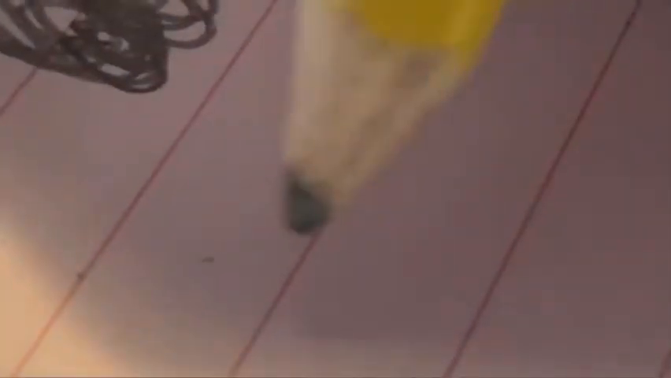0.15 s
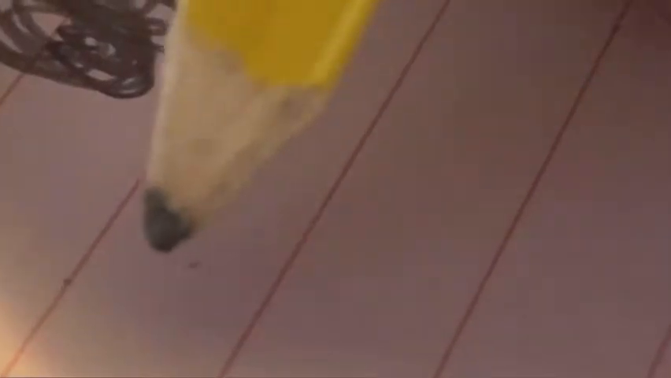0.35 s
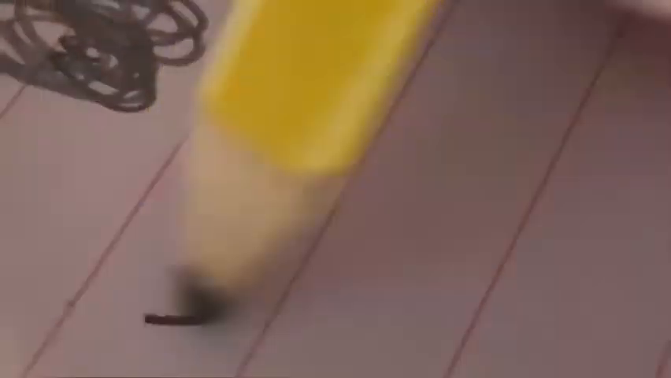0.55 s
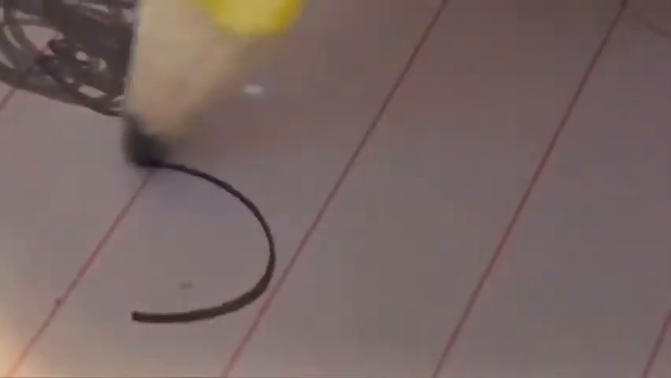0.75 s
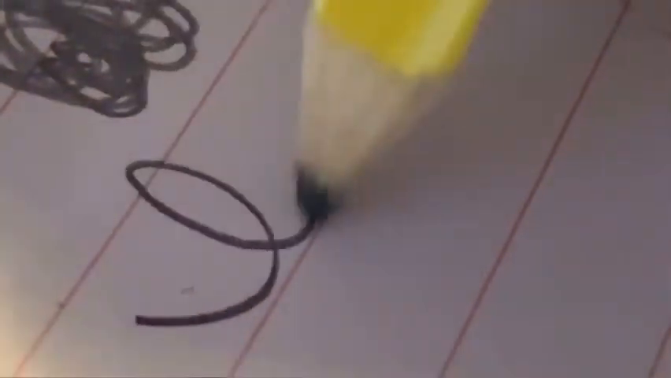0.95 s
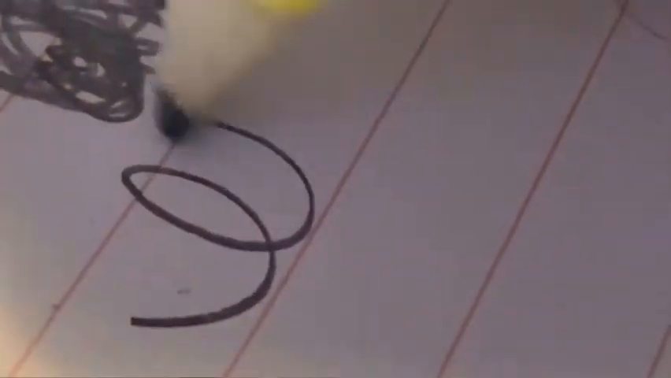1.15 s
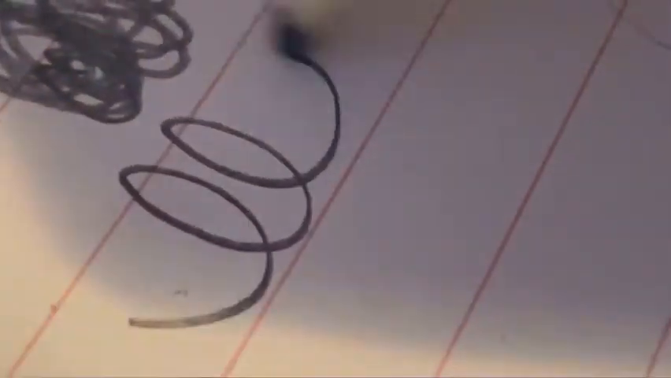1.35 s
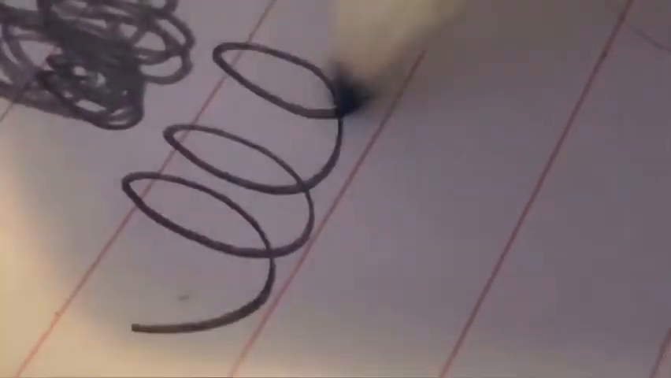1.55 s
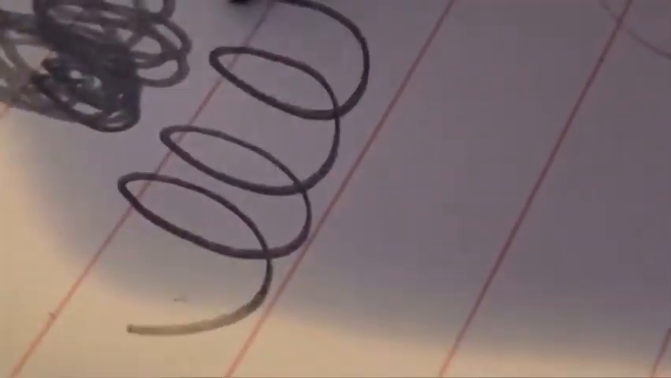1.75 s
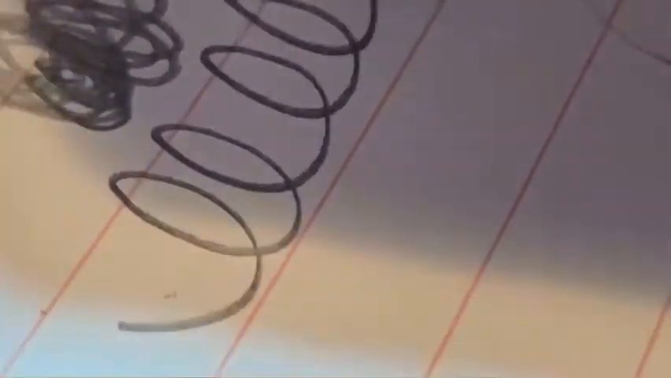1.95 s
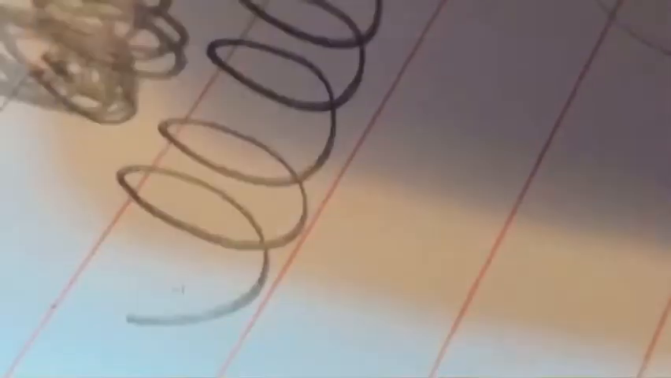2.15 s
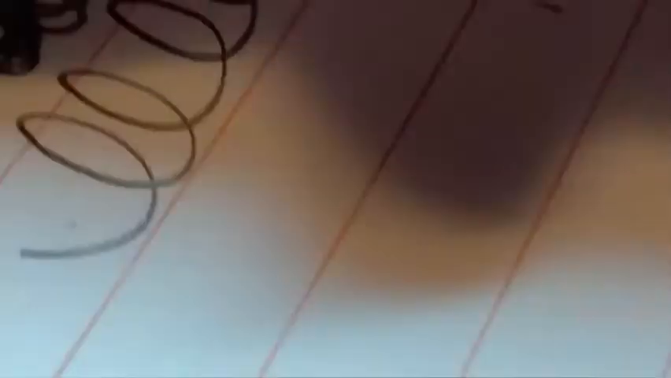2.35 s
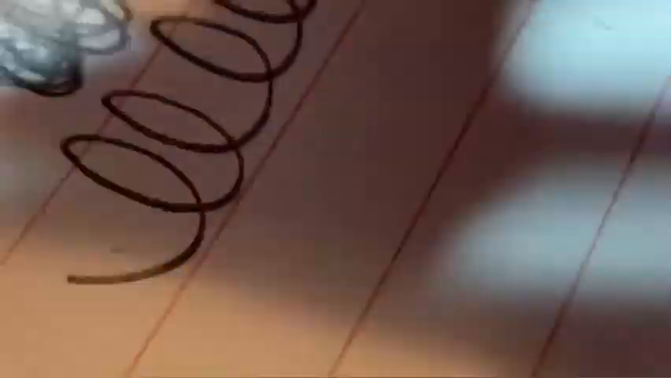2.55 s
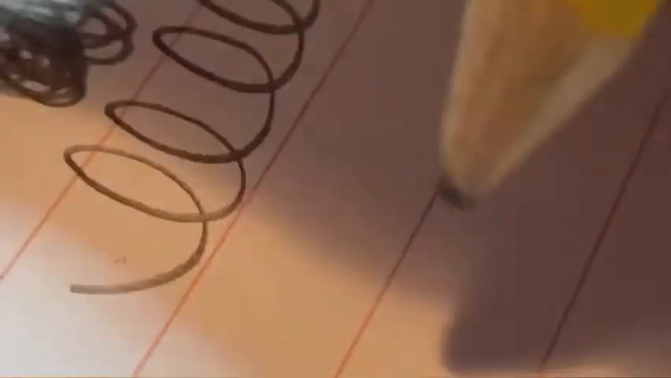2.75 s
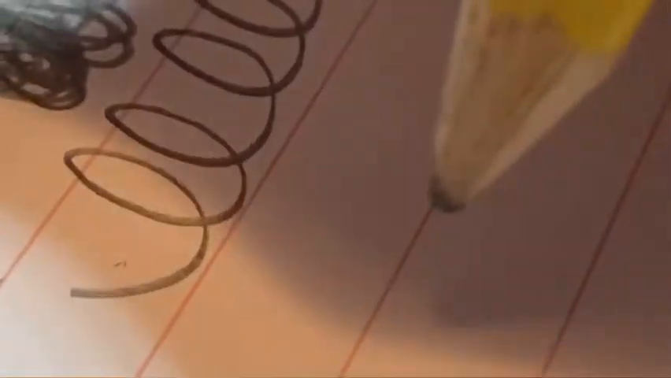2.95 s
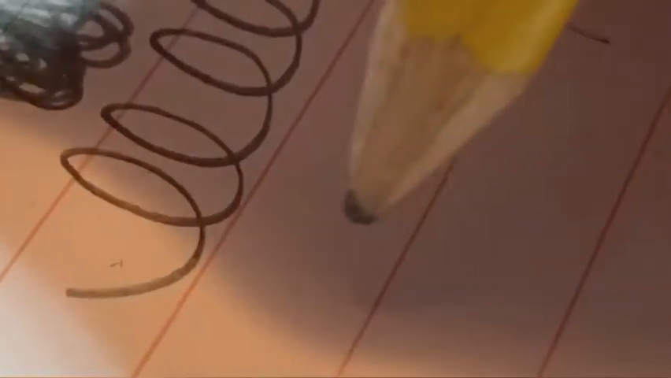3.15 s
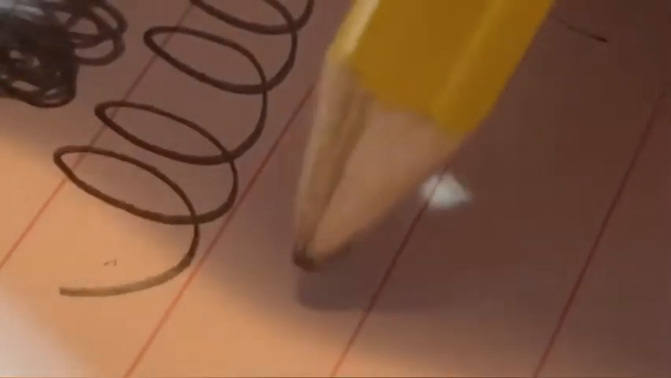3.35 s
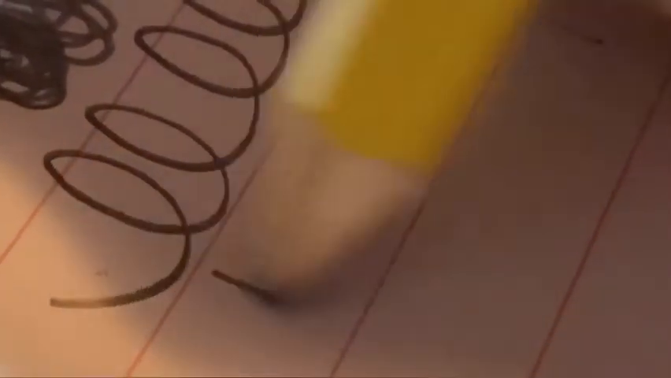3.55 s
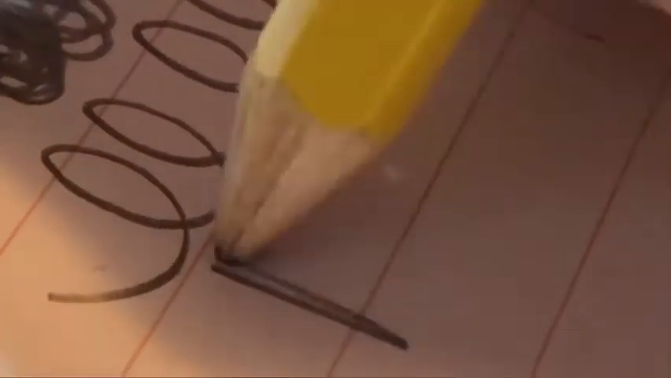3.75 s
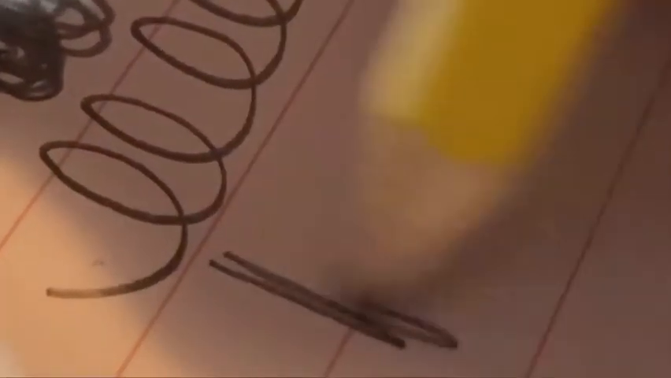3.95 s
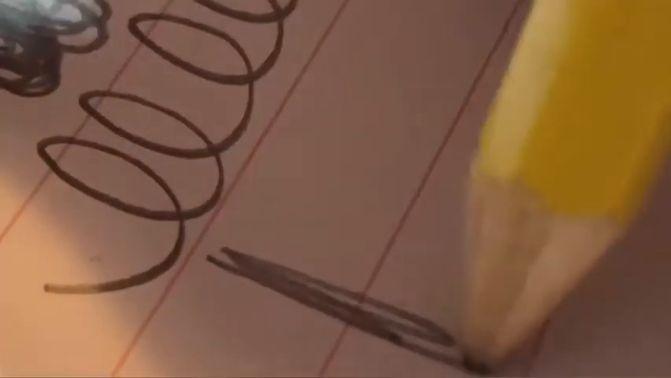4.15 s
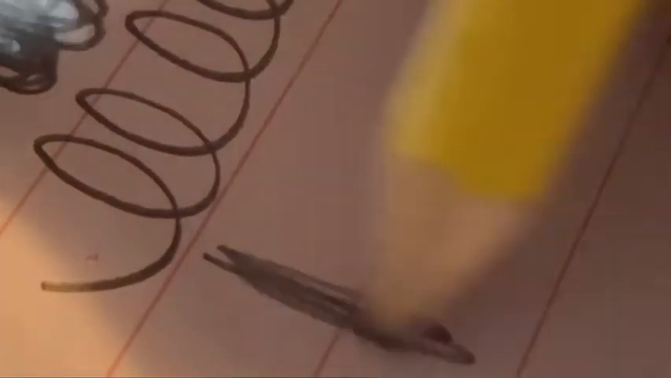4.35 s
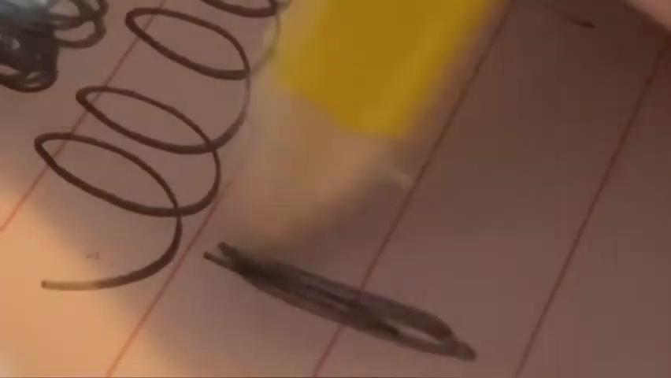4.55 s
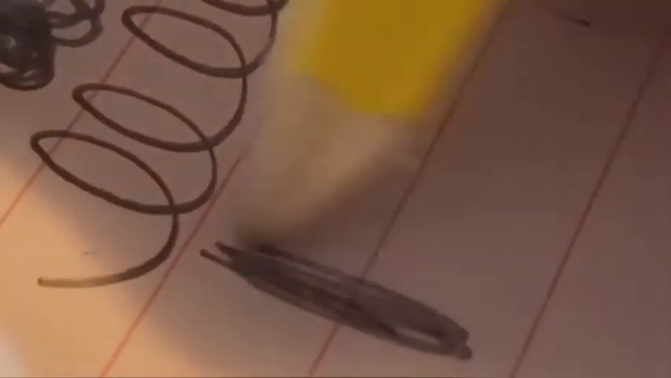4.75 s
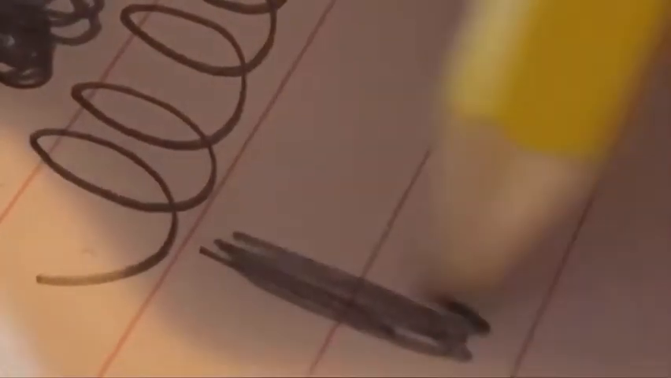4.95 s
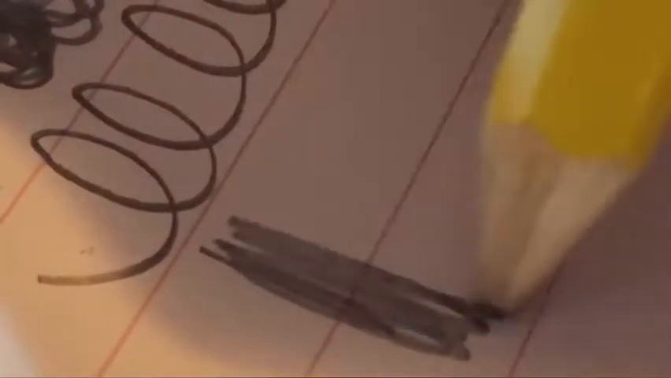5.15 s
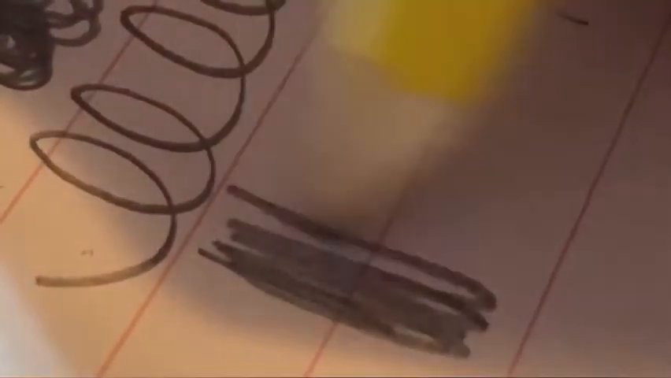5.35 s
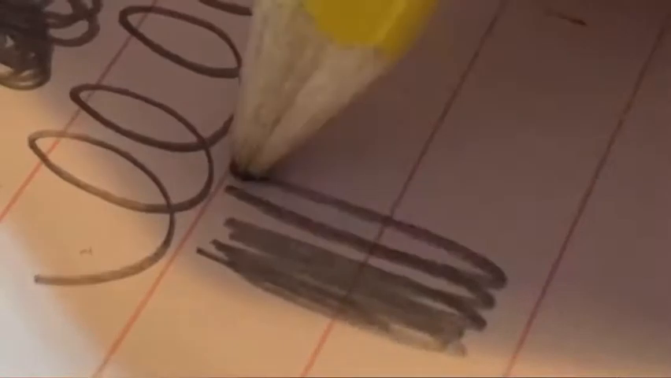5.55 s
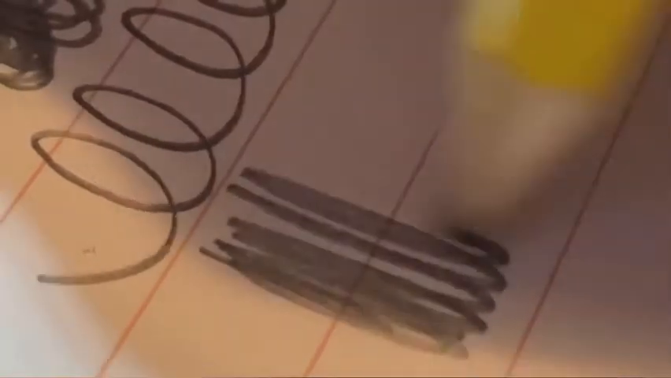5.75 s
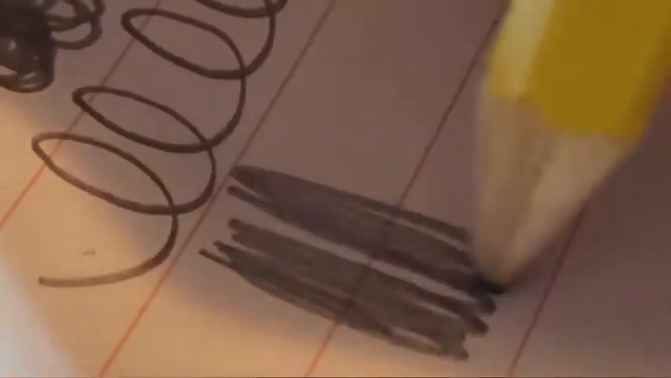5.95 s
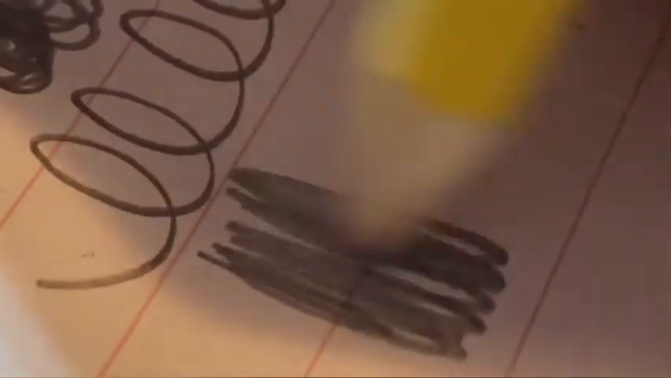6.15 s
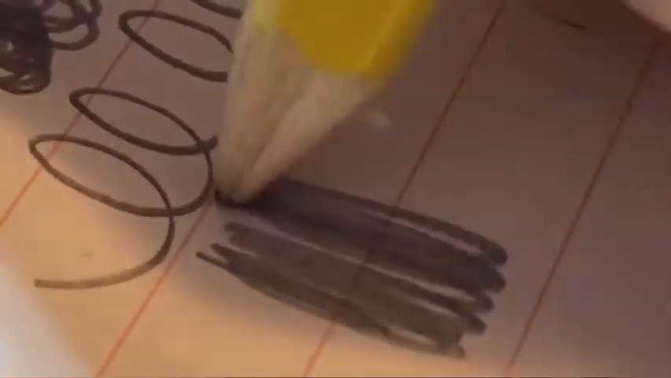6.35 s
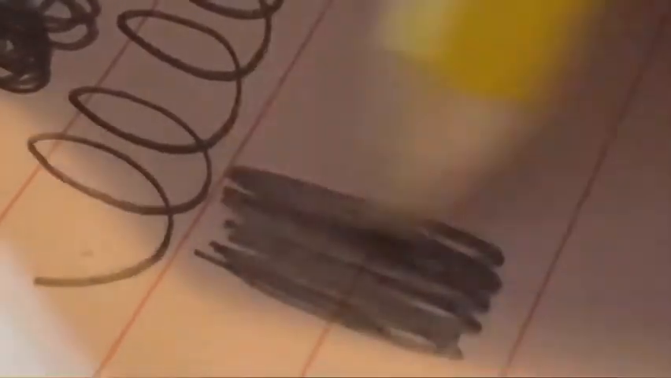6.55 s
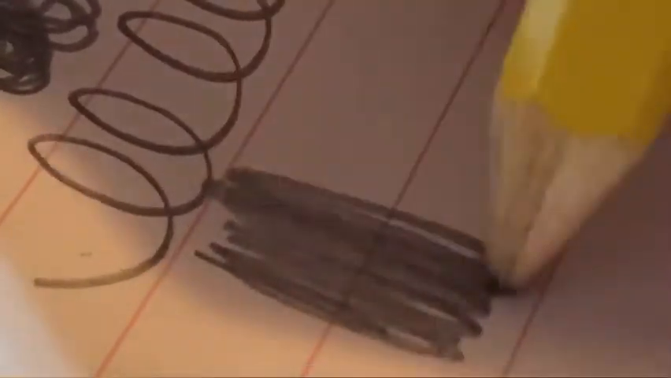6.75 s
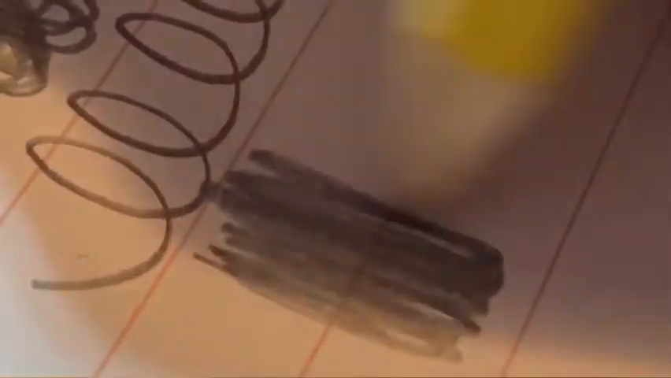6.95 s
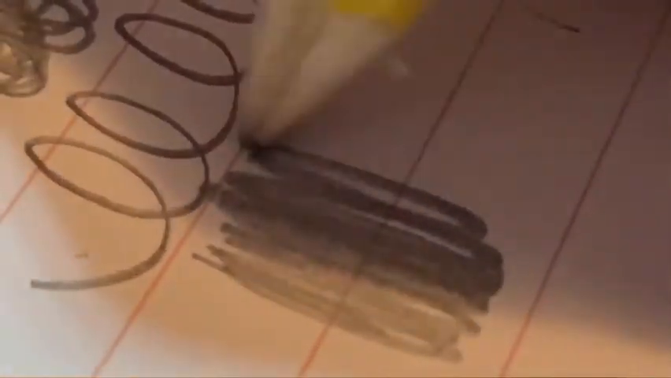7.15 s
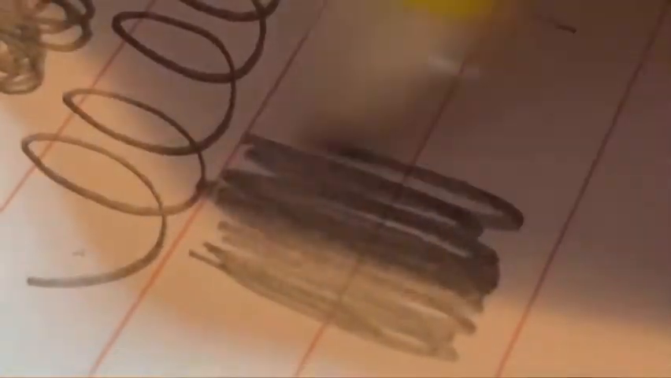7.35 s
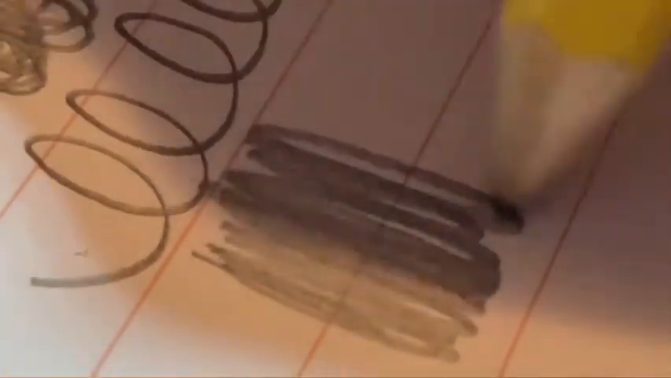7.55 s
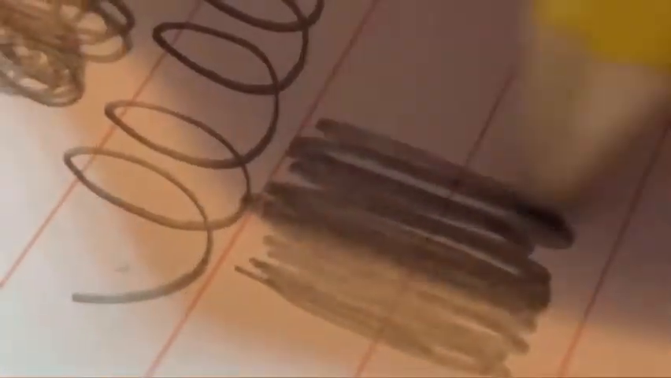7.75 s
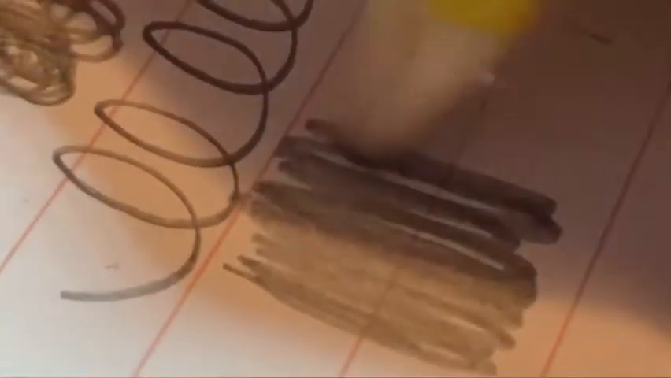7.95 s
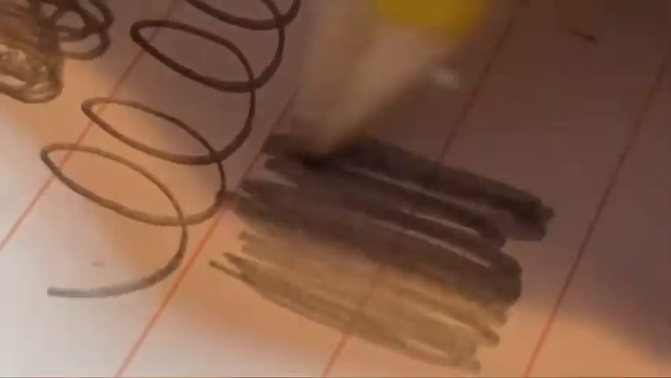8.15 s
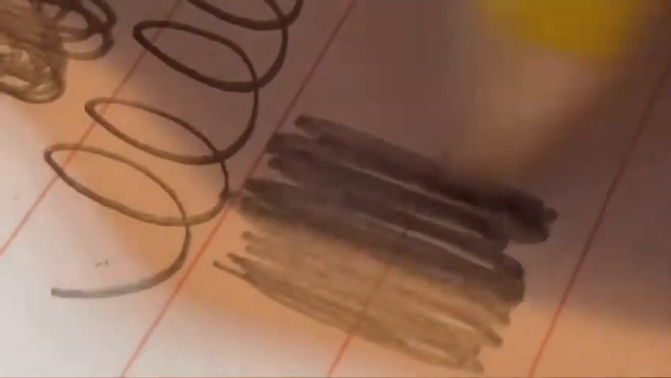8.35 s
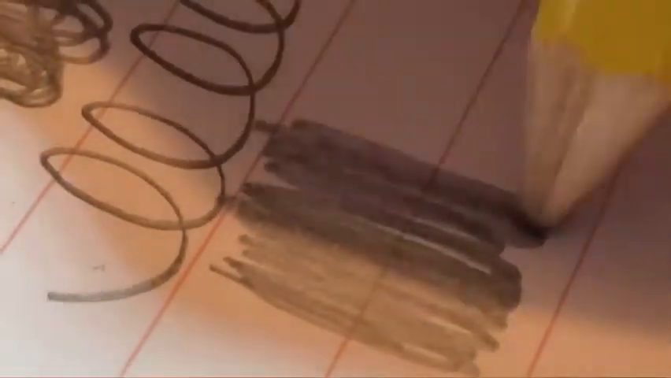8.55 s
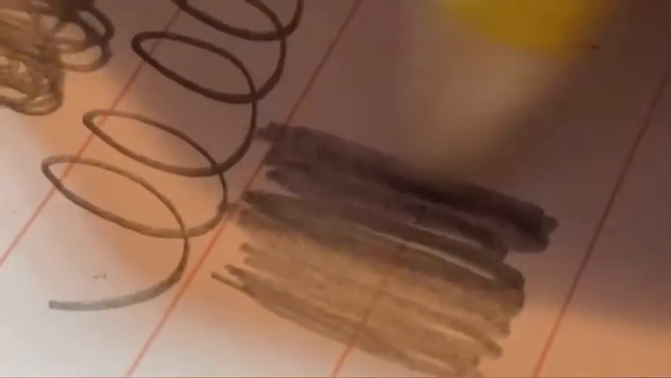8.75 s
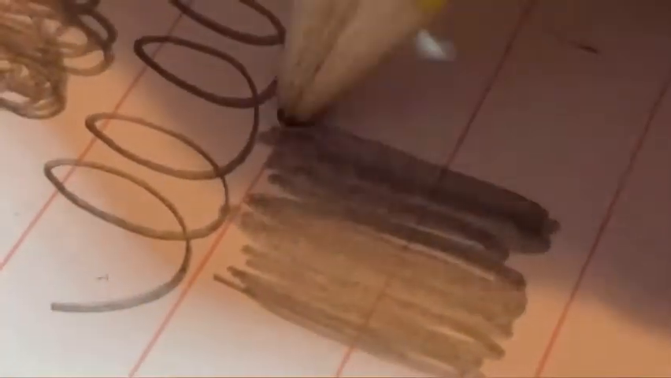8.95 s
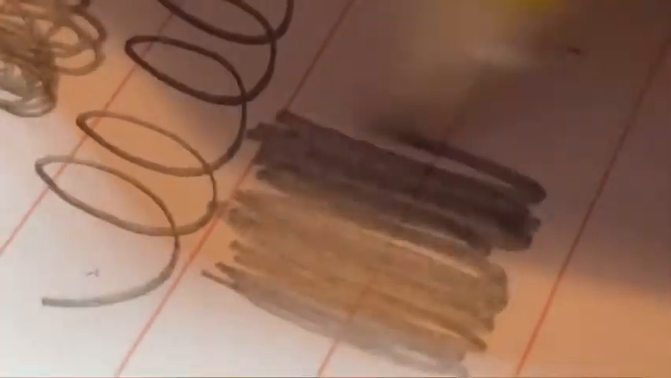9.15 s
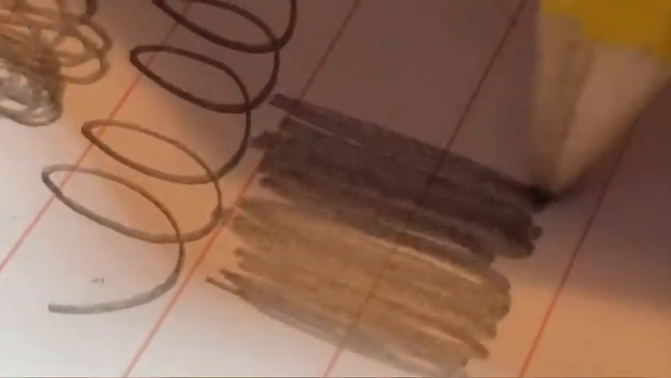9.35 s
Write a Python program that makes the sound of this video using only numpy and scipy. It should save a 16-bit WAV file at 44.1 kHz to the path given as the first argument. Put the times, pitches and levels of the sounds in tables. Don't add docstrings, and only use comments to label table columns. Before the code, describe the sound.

A wooden pencil scratches six quick loops on paper, a hand slides softly across the sheet, then rapid back-and-forth shading grows stronger, close up.

```python
import sys
import numpy as np
from scipy import signal
from scipy.fft import rfft, irfft, next_fast_len
from scipy.io import wavfile
from scipy.ndimage import uniform_filter1d

SR = 44100
rng = np.random.default_rng(int(sys.argv[2]) if len(sys.argv) > 2 else 0)


def pcm_store(signal):
    levels = np.round(np.clip(np.atleast_2d(signal), -1, 1) * 32767)
    wavfile.write(sys.argv[1], SR, levels.astype(np.int16).T)


def ratio(d):
    e = np.asarray(d, float) / 20
    return 10 ** e


N = 414981


def seconds():
    return np.arange(N) / SR


def rms_one(x):
    return x / np.sqrt(np.mean(x ** 2) + 1e-20)


def in_time(rows):
    s, *columns = np.transpose(rows)
    return [np.interp(seconds(), s, column) for column in columns]


def at_hz(points, hz):
    points = np.array(points)
    return np.interp(np.log(np.maximum(hz, 1)), np.log(points[:, 0]), points[:, 1])


def drift(per_s):
    r = np.exp(-80 * np.pi * per_s / SR)
    noise = rng.standard_normal(N // 40 + 2002)
    slow = signal.lfilter([1], [1, -2 * r, r * r], noise)[2000:]
    return np.interp(np.arange(N) / 40, np.arange(len(slow)), rms_one(slow))


def resonate(x, hz, width_hz):
    r = np.exp(-np.pi * width_hz / SR)
    poles = [1, -2 * r * np.cos(2 * np.pi * hz / SR), r * r]
    return signal.lfilter([(1 - r * r) / 2, 0, (r * r - 1) / 2], poles, x)


def passband(x, low_hz, high_hz):
    return signal.sosfilt(signal.butter(2, [low_hz, high_hz], "band", fs=SR, output="sos"), x)


def swell(times, levels_db):
    at = np.arange(round((times[0] - .0015) * SR), round((times[-1] + .0015) * SR))
    s = at / SR
    inside = np.minimum(s - times[0], times[-1] - s)
    return at, np.interp(s, times, levels_db), np.clip(.5 + inside / .003, 0, 1)


def fibres(per_s, spread_db):
    sizes = ratio(spread_db * np.minimum(rng.exponential(1, N), 4))
    signs = rng.choice([-1, 1], N)
    return sizes * signs * (rng.random(N) < per_s / SR)


def body(flicks, modes, flicker_db):
    ringing = 0
    for k, (hz, width_hz, db) in enumerate(modes):
        ringing = ringing + ratio(db + flicker_db * drift(11.7)) * resonate(flicks[k % 2], hz, width_hz)
    return rms_one(ringing)


# (frequency [Hz], width [Hz], level [dB])
DESK_MODES = [(78, 20.4, 3), (150, 45, 1), (271, 150, 2), (386, 200, -2)]
PAD_MODES = [(600, 280, 0.5), (782, 147, -3.5), (804, 100, -9)]
SHAFT_MODES = [(1750, 290, 8), (2340, 670, 9.5), (2820, 530, 7)]
LEAD_MODES = [(4352, 424, 7.5), (4660, 120, -61), (6250, 490, -5)]
TIP_MODES = [(8155, 290, 1), (10270, 3000, 0.5), (12320, 310, -4), (13900, 1300, -5.5), (16000, 380, 0.5)]
# (frequency [Hz], width [Hz], level [dB])
UPRIGHT_LEAD_MODES = [(4170, 930, 0), (4700, 360, -0.5), (5040, 1000, -18.5), (6800, 1500, -4.5)]


def pencil():
    flicks = [fibres(per_s=16000, spread_db=2.5), fibres(per_s=16000, spread_db=1.5)]
    upright = seconds() < OUT_STROKES[0][0]
    steep_lead = body(flicks, UPRIGHT_LEAD_MODES, flicker_db=-2.9)
    lead = np.where(upright, steep_lead, body(flicks, LEAD_MODES, flicker_db=1.47))
    lead = lead - .75 * resonate(lead, 5750, 450)
    shaft = body(flicks, SHAFT_MODES, flicker_db=2.5)
    tip = body(flicks, TIP_MODES, flicker_db=0.15)
    shaft = shaft + upright * (0.43 * resonate(shaft, 2670, 300) - 0.39 * resonate(shaft, 3350, 590))
    tip = tip - upright * .92 * resonate(tip, 13350, 1000)
    tip = tip + upright * 0.39 * resonate(tip, 16000, 1500)
    desk = passband(body(flicks, DESK_MODES, flicker_db=1.2), 56, 467)
    pad = passband(body(flicks, PAD_MODES, flicker_db=3.0), 213, 1010)
    parts = [lead, pad, passband(shaft, 1940, 7200), tip, desk]
    return ratio(0.5 * drift(56)) * np.sum(pencil_motion() * parts, axis=0)


def pencil_motion():
    gains = looping() + brushing() + shading()
    gains[4] = uniform_filter1d(gains[4], size=1300)
    return gains


# (start [s], stop [s], downswing [dB], bend [dB], upswing [dB])
LOOPS = [
    (0.325, 0.608, -48, -50, -45),
    (0.604, 0.941, -43, -50, -47),
    (0.941, 1.248, -44.5, -46.5, -42),
    (1.247, 1.542, -42, -47, -40),
    (1.562, 1.834, -39.5, -51, -41),
    (1.819, 1.947, -37, -42.5, -39),
]
LOOP_PARTS_DB = [1.5, -2.5, 2, 0.5, -10]
LOOP_FOLLOWS = [0.98, 0.24, 0.96, 0.84, 1.2]
RESTING_DB = [-76, -75, -76, -80, -62]


def looping():
    attack_s, release_s = 0.032, 0.063
    crest, bend = 0.22, 0.38
    breakaway_db = -12
    tip_wear_db_per_s = 3
    pad_settle_db, pad_settle_s = 8, 0.19
    gains, last_stop = np.zeros((5, N)), 0
    for start, stop, down_db, bend_db, up_db in LOOPS:
        length = stop - start
        cusp_db = -74 + 9.5 * start
        from_rest = start - last_stop > .008
        first_db = down_db + breakaway_db if from_rest else cusp_db
        times = [start, start + attack_s, start + crest * length + 0.0021,
                 start + bend * length, stop - release_s, stop]
        at, scratch_db, gate = swell(times, [first_db, down_db + 0.5, down_db, bend_db, up_db, cusp_db])
        parts_db = np.c_[LOOP_PARTS_DB] - 45 + np.c_[LOOP_FOLLOWS] * (scratch_db + 45)
        gains[:, at] += gate * ratio(parts_db)
        last_stop = stop
    at, _, gate = swell([LOOPS[0][0], last_stop], [0, 0])
    gains[:, at] += gate * ratio(np.c_[RESTING_DB])
    gains[3] *= ratio(-tip_wear_db_per_s * (seconds() - 2))
    gains[[1, 4]] *= ratio(pad_settle_db * np.exp((LOOPS[0][0] - seconds()) / pad_settle_s))
    return gains


# (start [s], stop [s], top level [dB])
BRUSHES = [
    (0.27, 0.283, -69),
    (3.245, 3.295, -58),
]
BRUSH_PARTS_DB = [-2.5, 0, -4, 0, -6.0]


def brushing():
    gains = np.zeros((5, N))
    for start, stop, top_db in BRUSHES:
        at, brush_db, gate = swell([start, stop, stop + .008, stop + .045],
                                   [top_db, top_db, top_db - 10, top_db - 20])
        gains[:, at] += gate * ratio(np.c_[BRUSH_PARTS_DB] + brush_db)
    return gains


# (start [s], stop [s], top level [dB], pointedness [exponent])
OUT_STROKES = [(3.338, 3.447, -36, 1.4), (3.583, 3.695, -35, 1.0), (3.834, 3.953, -38, 0.7),
               (4.098, 4.239, -35, 2.6), (4.356, 4.47, -34, 1.1), (4.609, 4.718, -33.5, .85),
               (4.867, 4.98, -33, 0.81), (5.128, 5.243, -33.5, 1.15), (5.396, 5.514, -33, 0.89),
               (5.666, 5.777, -33, 0.82), (5.925, 6.035, -34.5, 1.3), (6.181, 6.314, -35.5, 1.26),
               (6.451, 6.572, -34.5, 1.1), (6.716, 6.819, -32, 1.06), (6.969, 7.078, -32.5, 0.78),
               (7.234, 7.339, -31.5, 0.72), (7.491, 7.608, -32, 1.24), (7.749, 7.868, -33, 1.64),
               (8.004, 8.13, -34.5, 2.5), (8.26, 8.374, -33, 1.3), (8.52, 8.635, -33.5, 0.85),
               (8.786, 8.894, -30.5, 1.4), (9.042, 9.151, -29.5, 0.93), (9.3, 9.408, -30, 1.17)]
# (start [s], stop [s], top level [dB], pointedness [exponent])
BACK_STROKES = [(3.467, 3.56, -36.5, 0.8), (3.709, 3.815, -37.5, 0.55), (3.962, 4.074, -37.5, 0.8),
                (4.231, 4.336, -34.5, 0.95), (4.48, 4.59, -33, 1.14), (4.731, 4.849, -31.5, 1.26),
                (4.988, 5.109, -31, 1.7), (5.251, 5.374, -32, 1.47), (5.526, 5.646, -31, 1.5),
                (5.792, 5.9, -35, 0.77), (6.037, 6.168, -37, 1.75), (6.311, 6.436, -34, 1.4),
                (6.569, 6.692, -32, 1.7), (6.836, 6.946, -31.5, 1.05), (7.085, 7.215, -29.5, 2.2),
                (7.341, 7.476, -30.5, 2.3), (7.626, 7.728, -34, 0.85), (7.885, 7.983, -32.5, 0.85),
                (8.123, 8.237, -34, 1.16), (8.378, 8.498, -32.5, 1.5), (8.644, 8.765, -30, 2.1),
                (8.906, 9.021, -27, 1.84), (9.162, 9.28, -29, 1.34)]
# (shaft [dB], tip [dB], desk [dB])
STROKE_COLOUR = [
    (-5, 3, -13.5),
    (-8, 2.5, -12),
]
# (crest [share of stroke], breakaway jump [0-1], pad [dB], creeping lead [dB],
# creeping pad [dB])
STROKE_MANNER = [
    (.42, 0.13, -13, -50.5, -53.5),
    (.53, 0.06, -12.5, -56, -62.5),
]
# (time [s], level [dB])
PRESSURE = [(3.33, 6), (3.75, 1.5), (4.3, -1.5), (5.0, 1), (6.2, -0.5), (6.85, 0), (7.7, -1.5), (8.6, -1),
            (9.4, 4)]


def shading():
    grip_per_s = 8.7
    creep_loss_db_per_s = 600
    gains, turns, halt_from = np.zeros((5, N)), [], OUT_STROKES[0][0]
    strokes = sorted([(*row, 0) for row in OUT_STROKES] + [(*row, 1) for row in BACK_STROKES])
    for start, stop, top_db, pointed, way in strokes:
        crest, jump, pad_db, lead_creep_db, pad_creep_db = STROKE_MANNER[way]
        at = np.arange(round(start * SR), min(round(stop * SR), N))
        part = np.clip((at / SR - start) / (stop - start), 0, 1)
        rise = (part / crest) ** crest
        fall = ((1 - part) / (1 - crest)) ** (1 - crest)
        speed = (rise * fall) ** (2 * pointed)
        halt = max(start - halt_from, 0)
        share = np.clip(jump + grip_per_s * halt * (1 - way), 0, 1)
        speed = np.where(part < crest, share + (1 - share) * speed, speed)
        speed *= np.minimum((at / SR - start) / .0015, 1)
        shaft_db, tip_db, desk_db = STROKE_COLOUR[way]
        pad_db += np.interp(start, *np.transpose(PRESSURE))
        parts_db = np.c_[[0, pad_db + 3.5, shaft_db, tip_db, desk_db + 1.2 * (pad_db + 10)]]
        follows = np.c_[[1.02, .4, .9, 1.05, .45]]
        gains[:, at] += ratio(top_db - 4.5 + parts_db) * np.maximum(speed, 0) ** follows
        still_db = creep_loss_db_per_s * halt
        turns.append((start - .01, lead_creep_db - still_db, pad_creep_db - 1.2 * still_db))
        halt_from = stop
    lead_db, pad_db = in_time(turns)
    begun = seconds() > strokes[0][0]
    gains[[0, 2, 3]] += begun * ratio(lead_db + np.c_[[-6, -7, -7]])
    gains[1] += begun * ratio(pad_db + 6.0)
    gains[4] += begun * ratio(-65.5)
    return gains


# (time [s], peak level [dB], frequency [Hz], length [s])
JUDDERS = [(0.402, -35.5, 668, 0.082), (1.492, -40, 600, 0.084), (3.386, -43, 600, 0.072),
           (3.52, -38, 507, 0.043), (4.798, -34.5, 650, 0.034), (5.632, -34.5, 600, 0.0074),
           (6.914, -34.5, 600, 0.053), (7.163, -40.5, 600, 0.058), (7.437, -38, 600, 0.028),
           (8.478, -32, 340, 0.022), (8.507, -37, 334, 0.039), (8.486, -33, 590, 0.018),
           (8.544, -42.5, 482, 0.061), (8.505, -49, 1310, 0.018), (8.705, -44, 308, 0.02),
           (8.755, -38.5, 600, 0.014), (8.972, -29, 600, 0.024), (9.093, -34, 600, 0.022),
           (9.349, -36, 625, 0.046)]


def judders():
    out, chance, unsteady = np.zeros(N), rng.random((len(JUDDERS), 2)), drift(60)
    for (s, peak_db, hz, length), (phase, beat) in zip(JUDDERS, chance):
        at = np.arange(round((s - length) * SR), min(round((s + length) * SR), N))
        t = at / SR - s
        envelope = np.cos(np.pi * t / length / 2) ** 4
        waver = 1 + 0.32 * np.sin(2 * np.pi * (45 * t + beat))
        cycles = hz * t + phase + .12 * (hz / 600) ** 2 * unsteady[at]
        out[at] += ratio(peak_db) * envelope * waver * np.sin(2 * np.pi * cycles)
    return out


def hand():
    skin = [fibres(per_s=25000, spread_db=2.0), fibres(per_s=25000, spread_db=3.5)]
    hiss = body(skin, [(8750, 1100, -3.5), (11300, 4400, -10.0), (14300, 1900, -11.0)], flicker_db=-0.5)
    hiss = passband(hiss, 7200, 20000)
    rub = body(skin, [(2750, 1700, -1.2), (4470, 2600, -2.0), (6300, 2500, 1.0)], flicker_db=-3.0)
    rub = passband(passband(rub, 2500, 10600), 1700, 13000)
    sheet = body(skin, [(650, 380, -1.7), (990, 300, -0.24), (1610, 390, -0.85)], flicker_db=1.5)
    sheet = passband(sheet, 400, 2200)
    rumble = passband(body(skin, [(85, 58, 2.0), (251, 260, -12.0)], flicker_db=1.5), 50, 560)
    levels = hand_motion() * ratio(np.c_[[5.5, 1.5, 1.5, 1.5]])
    return np.sum(levels * [hiss, rub, sheet, rumble], axis=0)


# (start [s], stop [s], rub [dB], hiss [dB], sheet [dB])
SLIDES = [
    (1.954, 2.076, -56.5, -60, -68),
    (2.05, 2.2, -46.5, -49.5, -66),
    (2.17, 2.311, -44, -46.5, -62),
    (2.307, 2.41, -57.5, -59, -67),
    (2.381, 2.547, -55, -59.5, -63),
    (2.615, 2.725, -65.5, -62.5, -71),
    (2.72, 2.79, -78, -72, -84),
    (2.963, 3.03, -80, -68.5, -70),
    (3.03, 3.16, -77, -72, -75),
]
SLIDE_SAG_DB_PER_S = [49, 55, 134]


def hand_motion():
    attack_s, release_s, edge_db = 0.042, 0.044, -13
    lift_s, lift_rumble_db, settle_db_per_s = 1.95, -64.5, 18.5
    gains = np.zeros((4, N))
    for start, stop, rub_db, hiss_db, sheet_db in SLIDES:
        edge = min(1, (stop - start) / (attack_s + release_s + .005))
        set_in, let_go = start + edge * attack_s, stop - edge * release_s
        at, shape_db, gate = swell([start, set_in, let_go, stop], [edge_db, 0, 0, edge_db])
        sag_db = np.c_[SLIDE_SAG_DB_PER_S] * np.maximum(at / SR - set_in, 0)
        gains[:3, at] += gate * ratio(np.c_[[hiss_db, rub_db, sheet_db]] + shape_db - sag_db)
    since = seconds() - lift_s
    rumble_db = lift_rumble_db - settle_db_per_s * np.abs(since) + 2.5 * drift(6.0)
    gains[3] = np.clip(since / .02, 0, 1) * ratio(rumble_db)
    gains[:3] *= ratio(1.2 * drift(25))
    gains[3] += ratio(-18) * gains[2]
    return gains


# (time [s], peak level [dB], bright part [dB], dull part [dB])
TICKS = [(0.1545, -55, -25, -19), (0.2693, -47, -23, -3), (0.2764, -47.5, -21, -2), (2.031, -43, -20, -22),
         (2.0415, -35, -20, -20), (2.044, -38, -20, -18), (2.067, -34, -20, -18), (2.0855, -34, -16, -13),
         (2.295, -38, -14, -20), (2.3391, -36, -8, -23), (2.597, -56, -20, -6), (2.9993, -48, -1, -17),
         (3.248, -36, -15, -12), (3.8194, -34, -7, -16), (5.3798, -27, -10, -20), (5.9088, -29, -9, -22)]


def ticks():
    clicks = np.zeros((3, N)) + 1e-18
    for s, peak_db, bright_db, dull_db in TICKS:
        clicks[:, round(s * SR)] = ratio(peak_db + np.array([15, bright_db, dull_db + 30]))
    ring, bright, dull = clicks
    return resonate(ring, 2400, 890) + resonate(bright, 10000, 7000) + resonate(dull, 650, 350)


def nearby_echo(x, t60, level_db):
    t = np.arange(round(.12 * SR)) / SR
    tail = rng.standard_normal(len(t)) * ratio(-60 * t / t60)
    return ratio(level_db) * signal.fftconvolve(x, tail / np.sqrt(np.sum(tail ** 2)))[:N]


# (frequency [Hz], level [dB per Hz])
ROOM_TONE = [(15, -33), (25, -1.5), (91, 2.5), (286, -6.5), (599, -12.5), (741, -11.5), (7220, -21.5),
             (8930, -19), (11000, -26), (14000, -26)]


def room_tone():
    hz = np.arange(N // 2 + 1) * SR / N
    shape = ratio(at_hz(ROOM_TONE, hz)) * (hz < 13600)
    width = 0.45 * (hz > 150) * (hz < 1900)
    noise = rfft(rng.standard_normal((2, N)))
    mid, side = irfft(noise * shape * [np.ones(len(hz)), width], N)
    return ratio(-69.5) / np.std(mid) * np.array([mid + side, mid - side])


# (frequency [Hz], level [dB])
PORT_BALANCE = [(60, 0), (140, 1), (330, 2), (500, 6), (770, 7.5), (1170, 4.5), (1790, .5), (2400, 0)]


def scene():
    trembles = judders()
    close = pencil() + trembles + hand() + ticks()
    left = close + passband(nearby_echo(close, t60=0.05, level_db=-16), 77, 6000)
    hz = np.arange(N // 2 + 1) * SR / N
    right = irfft(rfft(left) * ratio(-at_hz(PORT_BALANCE, hz)), N)
    right = right + .7 * passband(trembles, 220, 420)
    return np.array([left, right]) + room_tone()


def roll_off(x):
    return signal.sosfilt(signal.butter(12, 16810, fs=SR, output="sos"), x)


# (frequency [Hz], lead [half cycles])
PORT_LEAD = [(7500, 0), (7750, .33), (8700, .9), (9100, 1), (9400, 1.1), (9800, 1.42), (10900, 2),
             (11600, 2), (11800, 2.3), (12700, 2.9), (13300, 3), (13850, 3.1), (14100, 3.45), (14900, 4)]
# (frequency [Hz], phase [radians])
PORT_WAVER = [(50, .07), (150, .4), (400, .6), (700, .3), (1250, .5), (1900, .1), (2300, 0)]


def record(dry):
    size = next_fast_len(N + 4096)
    hz = np.arange(size // 2 + 1) * SR / size
    lead = np.pi * np.interp(hz, *np.transpose(PORT_LEAD))
    waver = at_hz(PORT_WAVER, hz) + .7 * np.abs(np.sin(lead))
    ahead = rfft(dry[1], size) * np.exp(1j * lead)
    steady, turned = irfft(ahead * [np.cos(waver), 1j * np.sin(waver)], size)[:, :N]
    ports = np.array([dry[0], steady + rms_one(np.tanh(drift(19.3))) * turned])
    top_cut = signal.ellip(10, .5, 70, 15800, fs=SR, output="sos")
    return roll_off(signal.sosfilt(top_cut, ports))


dry = scene()
out = record(dry)
pcm_store(out)
```